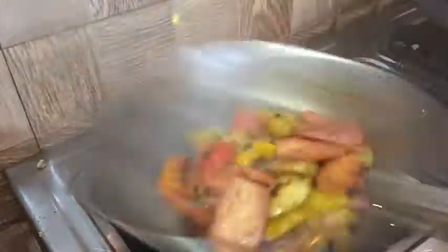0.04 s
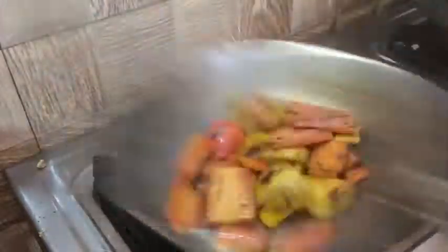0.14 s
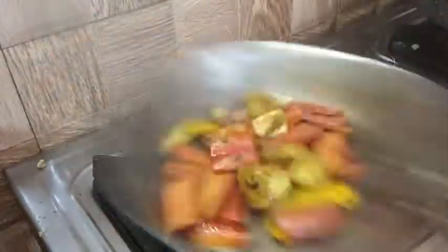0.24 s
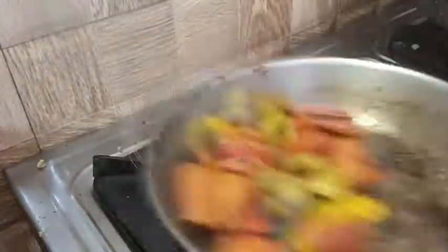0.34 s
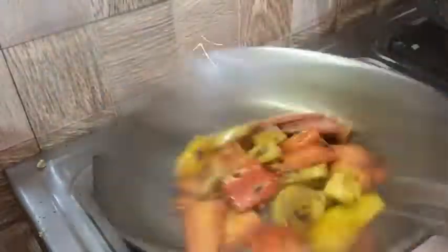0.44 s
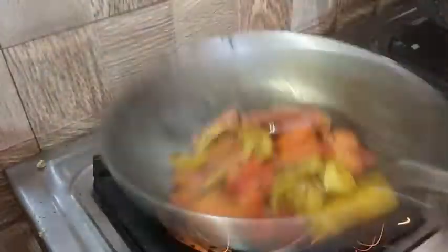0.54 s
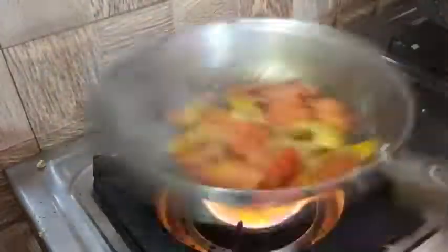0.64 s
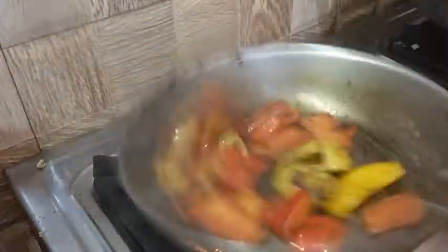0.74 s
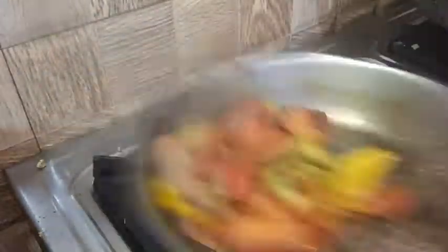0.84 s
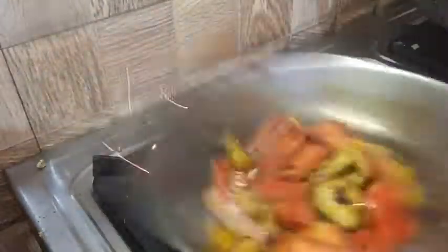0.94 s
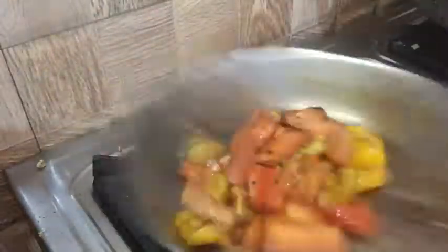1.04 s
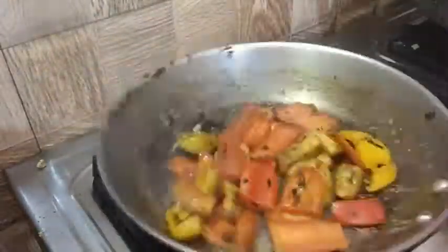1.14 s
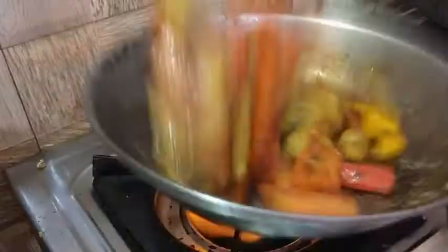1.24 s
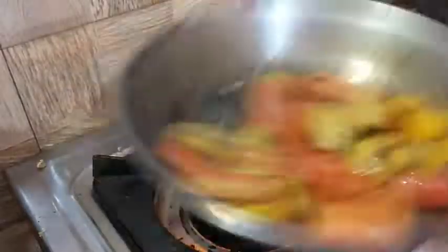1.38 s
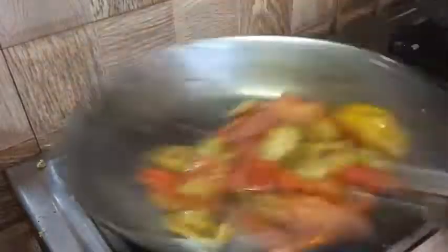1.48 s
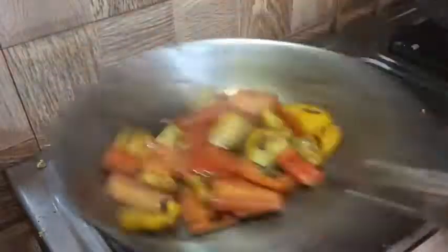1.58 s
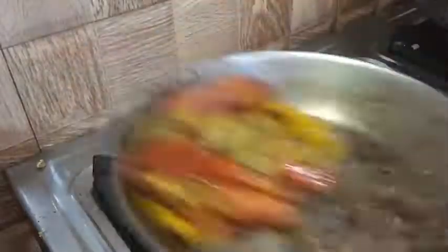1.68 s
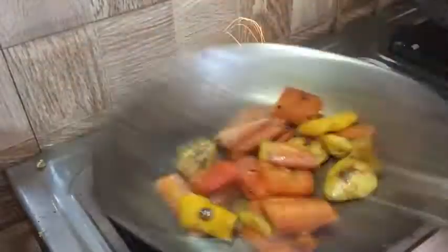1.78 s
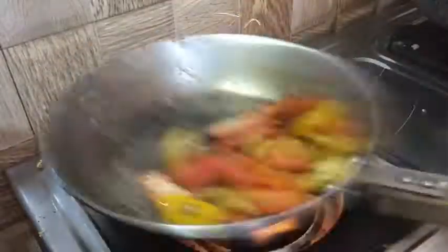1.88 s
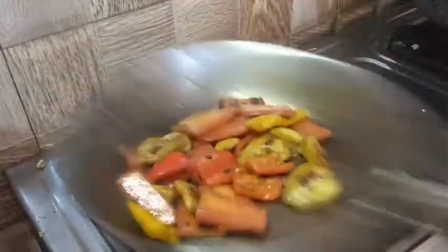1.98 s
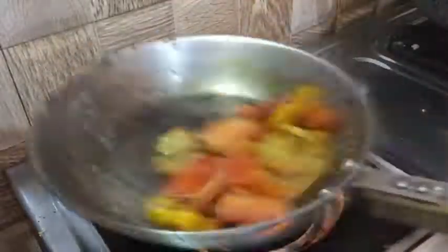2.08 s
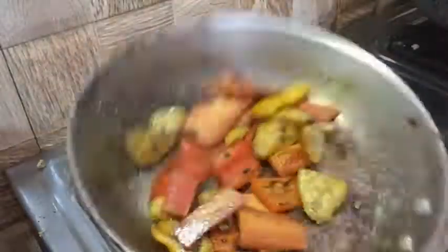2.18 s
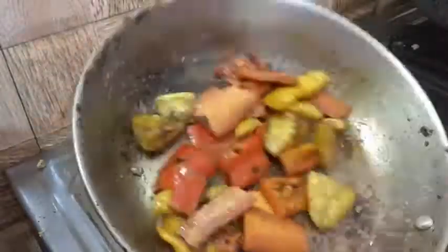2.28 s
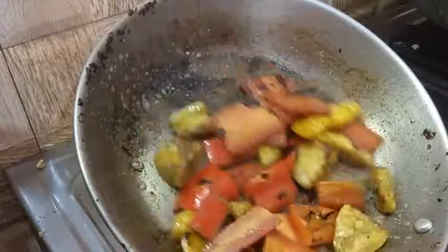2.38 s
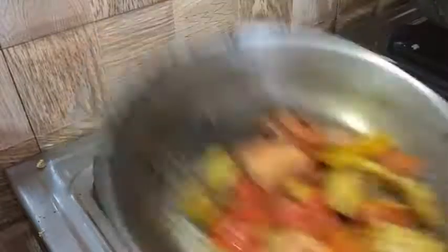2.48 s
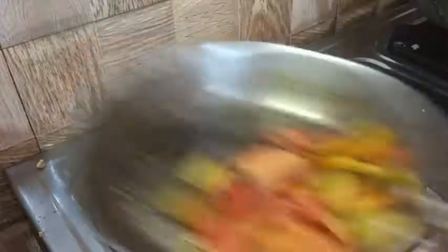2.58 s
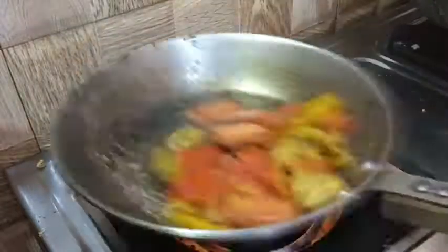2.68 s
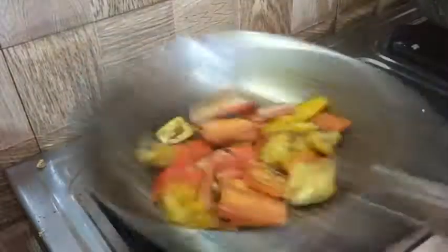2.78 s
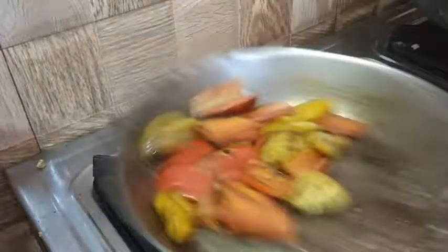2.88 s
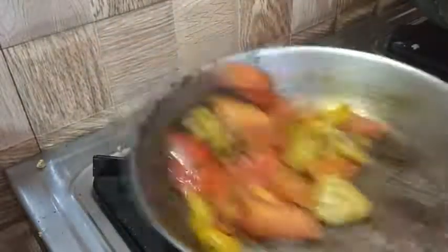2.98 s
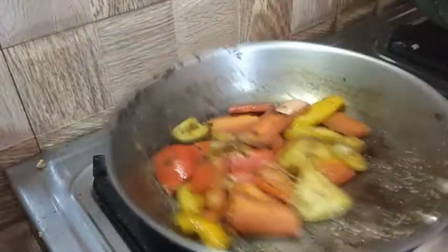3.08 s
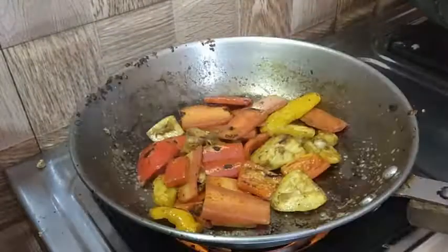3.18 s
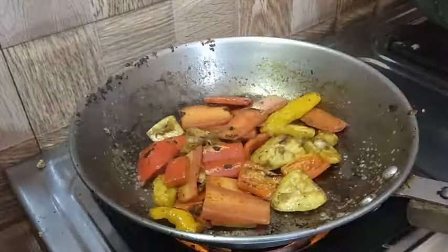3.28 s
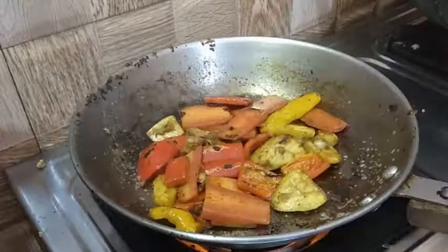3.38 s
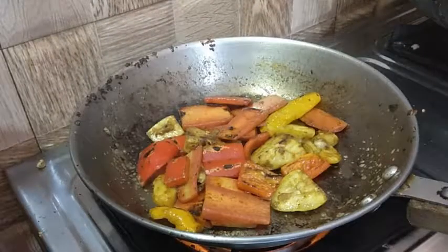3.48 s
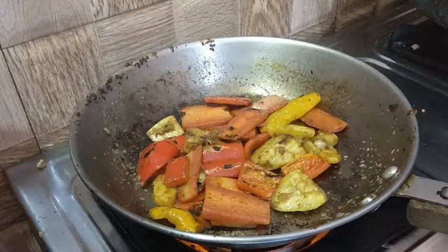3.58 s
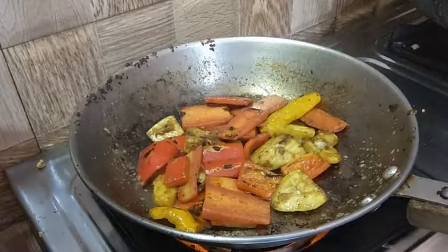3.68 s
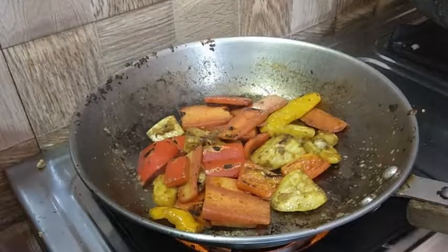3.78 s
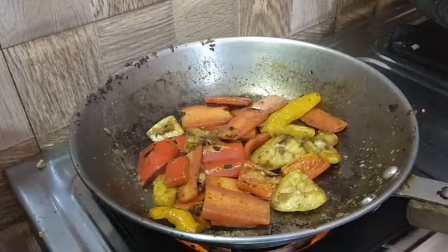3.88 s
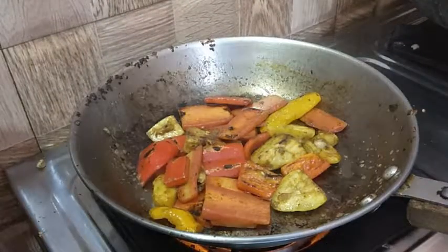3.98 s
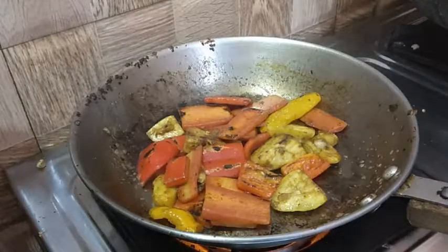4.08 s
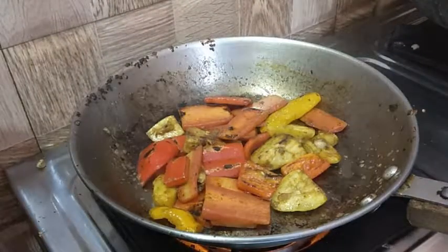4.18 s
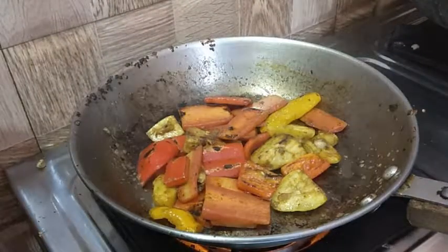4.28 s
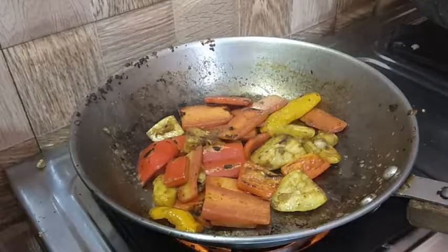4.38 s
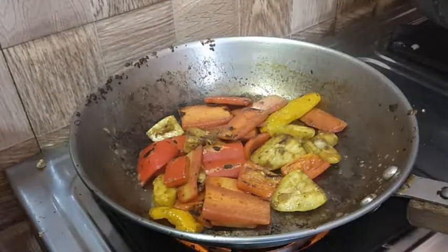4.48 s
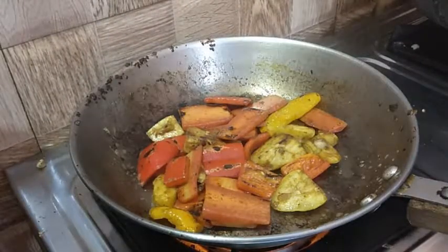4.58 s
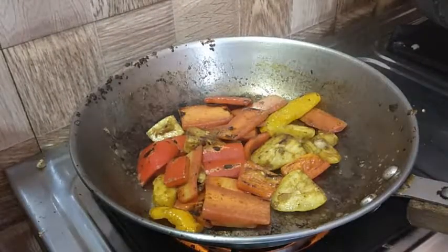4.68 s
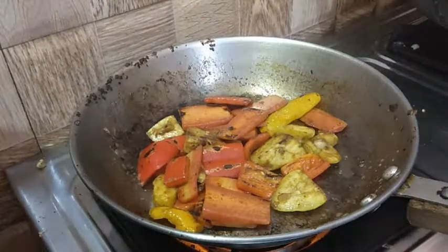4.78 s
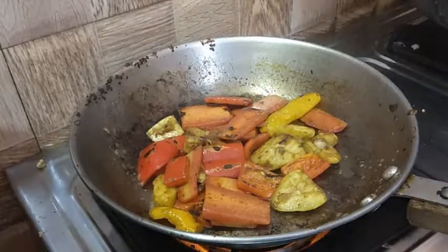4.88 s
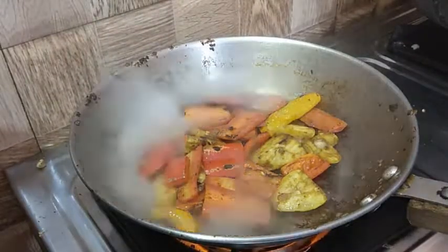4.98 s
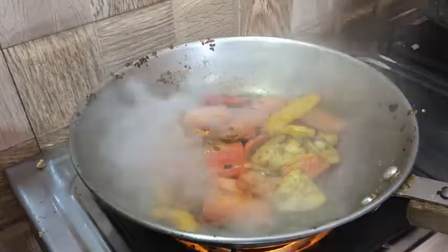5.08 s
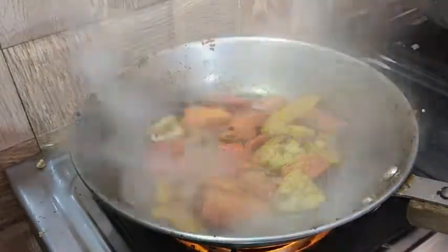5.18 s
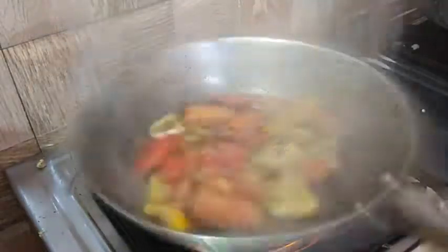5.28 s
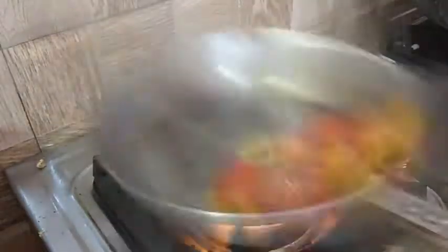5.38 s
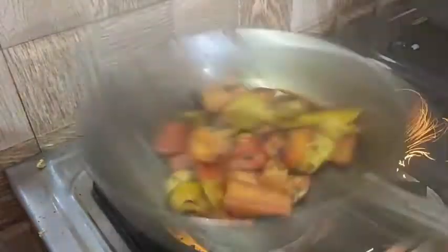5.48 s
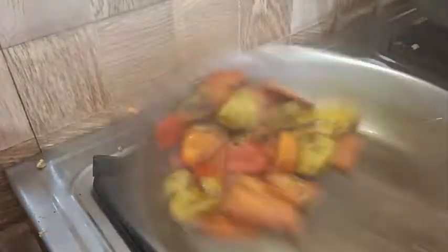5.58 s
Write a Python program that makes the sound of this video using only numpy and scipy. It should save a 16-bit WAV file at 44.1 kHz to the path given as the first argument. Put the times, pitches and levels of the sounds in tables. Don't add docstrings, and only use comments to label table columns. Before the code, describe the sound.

Loud close metallic knocks and drags of a wok, a calm stretch of oil sizzle and gas burner hum, then a sudden steamy hiss and renewed clatter.

```python
import sys
import numpy as np
from scipy import signal
from scipy.fft import rfft, irfft
from scipy.io import wavfile
from scipy.ndimage import uniform_filter1d, minimum_filter1d

SR = 44100
rng = np.random.default_rng(int(sys.argv[2]) if len(sys.argv) > 2 else 0)


def nominal_scale(level):
    x = np.asarray(level, float) / 20
    return 10 ** x


def put_to_file(sound):
    columns = np.atleast_2d(sound).T
    safe = np.clip(columns, -1, 1)
    whole_steps = np.round(safe * 32767)
    wavfile.write(sys.argv[1], SR, whole_steps.astype(np.int16))


N = 248724

# start_s, peak_db, bright_edge_db, fade_t60_s
FIRST_STRIKES = [(0.0, -2.5, -3, 0.28), (0.1538, -5, 0, 0.26), (.21, 2, -3.5, 0.12),
                 (0.2503, -2, -8, 0.097), (.2764, -2.5, -2, 0.4), (0.343, -12, -20, 0.16),
                 (.382, 1.5, -7.5, 0.093), (.417, -3.5, -3, 0.31), (.488, -6, -3.5, 0.4),
                 (0.5857, -4.5, -3.5, 0.5), (.7008, -26, -10, .15), (.7205, -8.5, -5.5, 0.13),
                 (.7383, -7.5, -5.5, 0.27), (0.7847, -7.5, -11, 0.27), (0.849, -8, -5, 0.45),
                 (0.8792, -4.5, -3, 0.22), (.9673, -4.5, -2.5, 0.26), (1.0486, -18, -17, 0.082),
                 (1.1415, -11, -13, 0.089), (1.2523, -14.5, -13, 0.17)]
# start_s, peak_db, bright_edge_db, fade_t60_s
LATER_STRIKES = [(1.4814, -28.5, 13.5, 0.046), (1.5162, -8, -7, 0.14), (1.5698, 5.5, -5, 0.21),
                 (1.651, -7, -7, 0.2), (1.688, -6.5, -5.5, 0.69), (1.738, -4.5, -23, .19),
                 (1.7614, 4.5, -6, 0.15), (1.793, -5.5, -3, 0.2), (1.8683, 3.5, -5, 0.15),
                 (1.8973, -3.5, -6, 0.23), (1.947, -10.5, -10, 0.15), (2.0404, -5.5, -8, .17),
                 (2.0818, -2, -5, .13), (2.6298, 1, -5.5, 0.17), (2.8555, -5.5, -4.5, 0.26),
                 (3.0138, -8.5, -3, 0.44), (3.0694, -15, -11, 0.17), (5.253, -7, -5.5, 0.37),
                 (5.375, -8.5, -7, 0.37), (5.441, -4.5, -1, 0.21), (5.4683, -9.5, -19, .19),
                 (5.5309, -11, 0, 0.17), (5.5576, -9.5, -17, .5)]


def wok():
    # mode_hz, width_hz, level_db
    pan_modes = [(474, 23, 2), (471, 38, -2), (495, 49, -15), (630, 13, -16), (713.2, 22.2, 1),
                 (817, 45, -7.5), (872, 24, -14.5), (921, 6.7, -15.5), (1100, 17, -7.5), (1187, 48, -7),
                 (1310, 36, -13.5), (1413, 120, -7), (1683, 46, -10), (1690, 110, -9.5), (1837, 70, -14.5),
                 (2007, 110, -18), (2232, 93, -10), (2226, 120, -16.5), (2420, 99, -13.5), (2355, 87, -1.5),
                 (2400, 32, -17), (2762, 126, -2.5), (2885, 63, -18.5), (3600, 90, -58), (3783, 58, -12),
                 (5060, 40, -12), (7750, 120, -50)]
    # freq_hz, density_db_per_hz
    rub_spectrum = [(18, -56), (30, -37), (295, -59.5), (390, -12.5), (443, -3), (571, -2.5), (700, -7),
                    (775, -6.5), (2310, -5.5), (3130, -9), (7630, -12.5), (10600, -14.5), (13000, -21)]
    bowl_hz, bowl_width_hz = 713, 23

    force = np.zeros((3, N))
    for start_s, peak_db, bowl_db, edge_db, rise_s, slide_s, t60_s in knocks():
        i, age_s = after(start_s, .4)
        rise = 1 - np.exp(-age_s / rise_s)
        fade_db = -60 * np.maximum(age_s - slide_s, 0) / max(t60_s, .01)
        shape = rise * nominal_scale(peak_db + fade_db)
        crack = 1 + np.array([[.15], [.9], [1.3]]) * np.exp(-age_s / 0.0078)
        balance = nominal_scale(np.array([[bowl_db], [0], [edge_db]]))
        force[:, i] += (shape * crack * balance) ** 2

    slip = grains(per_s=2500, spread_db=3.5, bed=0.94) * nominal_scale(3.44 * walk(140))
    modes = 0
    for k, (hz, width_hz, level_db) in enumerate(pan_modes):
        wander = nominal_scale(2.3 * walk(45))
        modes = modes + (-1) ** k * nominal_scale(level_db) * ring(slip * wander, hz, width_hz)
    body = nominal_scale(1) * unit(modes) + nominal_scale(3) * unit(colour(slip, rub_spectrum))
    bowl, edge = split(body, 900, "low"), split(body, 3200, "high")
    middle = body - bowl - edge
    parts = np.array([steady(p, even=.65) for p in (bowl, middle, edge)])

    hum = steady(ring(rng.standard_normal(N), bowl_hz, bowl_width_hz), even=.7)
    note = ring(np.sqrt(force[0]) * hum, bowl_hz, 1.3 * bowl_width_hz) / 17
    chatter = rattle(per_s=70, fade_s=.004, depth=.7)
    contact = chatter * (np.sqrt(force) * parts).sum(axis=0)
    return nominal_scale(-9.5) * (contact + nominal_scale(-2) * note)


def knocks():
    # start_s, peak_db, bright_edge_db, fade_t60_s
    drags = [(.065, -3.5, -6, 0.51), (.3132, 1, -2.5, 0.099), (.4544, -11.5, -12, 0.13),
             (.5275, -11.5, -2.5, 0.65), (.6244, -8.5, -4, .11), (.814, -6, -5.5, 0.077),
             (.9194, -13, -8, 0.65), (1.618, -3, -3.5, 0.1), (1.9764, 3, -5.5, 0.2),
             (1.9994, -2.5, -3.5, 0.35), (2.5287, -11.5, -2.5, 0.73), (2.5934, -1, -7, 0.098),
             (2.6954, -8, -7, 0.46), (2.7484, -10, -10, 0.21), (2.795, -5.5, -2.5, 0.33),
             (2.9193, -8, -10, 0.25), (2.9714, -7.5, -7.5, 0.41), (3.04, -3.5, -8, 0.15),
             (5.3434, -10.5, -1, 0.23), (5.3994, -7.5, -6, 0.26), (5.4994, -9, -1, 0.12),
             (5.611, -2, -8, 0.18)]
    strike_rise_s, strike_slide_s = .0004, 0.011
    drag_rise_s, drag_slide_s = 0.0047, .017
    kinds = ((FIRST_STRIKES + LATER_STRIKES, strike_rise_s, strike_slide_s),
             (drags, drag_rise_s, drag_slide_s))
    contacts = []
    for rows, rise_s, slide_s in kinds:
        for start_s, peak_db, edge_db, t60_s in rows:
            bowl_db = -12.5 - 0.5 * peak_db + 6.3 * t60_s
            contacts.append((start_s, peak_db, bowl_db, edge_db, rise_s, slide_s, t60_s))
    return contacts


def rattle(per_s, fade_s, depth):
    jumps = (rng.random(N) < per_s / SR) * np.minimum(rng.exponential(size=N), 2.5)
    jumps[[int(row[0] * SR) for row in FIRST_STRIKES + LATER_STRIKES]] = 0.4
    rebounds = signal.lfilter([1], [1, -np.exp(-1 / (fade_s * SR))], jumps)
    return unit(1 + depth * rebounds)


def pings():
    # start_s, peak_db, mode_hz, t60_s
    touches = [(0.38, -13, 3770, 0.05), (.645, -9.5, 3960, .06), (.645, -5.5, 7750, 0.073),
               (1.142, -13, 990, 0.054), (1.143, -23, 2380, .05), (1.255, -23, 1100, 0.088),
               (1.262, -18, 2490, 0.14), (1.515, -9.5, 1346, 0.066), (1.516, -4, 2430, 0.038),
               (1.573, -7.5, 2400, 0.2), (1.83, -15, 3600, 0.076), (1.829, -16, 2430, 0.086),
               (1.868, -1, 4000, 0.044), (2.04, -10, 3750, 0.064), (2.087, -3, 2885, 0.081),
               (2.795, -16, 3970, .08), (3.013, -17, 3680, 0.099), (5.532, -7, 6350, 0.033)]
    out = np.zeros(N)
    for start_s, peak_db, hz, t60_s in touches:
        i, age_s = after(start_s, .4)
        rise = 1 - np.exp(-age_s / 0.00043)
        out[i] += rise * nominal_scale(peak_db - 60 * age_s / t60_s) * np.sin(2 * np.pi * hz * age_s)
    return out * nominal_scale(2.2 * walk(200))


def sizzle(top_db, body_db):
    # freq_hz, density_db_per_hz
    hiss_spectrum = [(30, -12.5), (270, -9.5), (800, -7.5), (1200, -1.5), (1700, 0.5), (2300, 1.5),
                     (5000, 0.5), (9800, -0.5), (11700, -5), (13000, -7)]
    fizz = colour(grains(per_s=3000, spread_db=2.6, bed=1.3), hiss_spectrum)
    fizz = fizz / np.std(split(fizz, 4500, "high"))
    low = signal.sosfilt(signal.butter(1, 2500, fs=SR, output="sos"), fizz)
    flicker_db = .6 * walk(30) + .8 * walk(120)
    return nominal_scale(top_db + flicker_db) * mottle(fizz + (nominal_scale(body_db) - 1) * low)


def mottle(x):
    lows = [split(x, hz, "low") for hz in (1400, 2500, 4200, 7000)]
    bands = [b - a for a, b in zip([0] + lows, lows + [x])]
    return sum(band * nominal_scale(1.66 * walk(35)) for band in bands)


def spits():
    # start_s, peak_db
    drops = [(3.3588, -21), (3.5608, -18), (3.9808, -9.5), (4.3896, -15.5), (4.648, -17), (4.8763, -20),
             (4.8944, -17), (4.955, -2), (4.965, -19), (4.915, -17), (1.6885, -12)]
    out, hiss = np.zeros(N), rng.standard_normal(N)
    for start_s, peak_db in drops:
        i, age_s = after(start_s, .1)
        burst = np.exp(-age_s / 0.0013) + 0.38 * np.exp(-age_s / 0.013)
        out[i] += nominal_scale(peak_db - 3.0) * burst * hiss[i]
    return split(out, 1100, "high")


def frying():
    # time_s, sizzle_db
    oil_heat = [(0, -29.5), (.31, -23), (1.09, -26), (1.26, -30), (1.57, -25.5), (2.0, -30.5),
                (2.32, -27.5), (2.63, -27), (3.05, -27.5), (3.22, -32), (3.87, -31.5), (4.2, -31.5),
                (4.6, -37), (4.72, -30.5), (4.87, -36.5), (5.64, -35.5)]
    # leaves_s, lands_s, hush_db
    flights = [
        (1.092, 1.133, -12),
        (1.192, 1.254, -22),
        (1.93, 1.964, 2),
        (2.095, 2.312, -5.5),
    ]
    lift_s, steam_s = 0.03, 4.877
    t = np.arange(N) / SR
    oil_db = curve(*np.transpose(oil_heat))
    for leaves_s, lands_s, hush_db in flights:
        lift = 1 - np.exp(-np.maximum(t - leaves_s, 0) / lift_s)
        oil_db = oil_db + hush_db * (t < lands_s) * lift

    age_s, steaming = np.maximum(t - steam_s, 0), t >= steam_s
    burst_db = 2.5 * np.exp(-(age_s / 0.12) ** 4)
    sag_db = 4 * np.minimum(age_s, .37)
    top_db = np.where(steaming, -20 + burst_db - sag_db, oil_db)
    steam_body_db = 2 + 2.5 * np.exp(-age_s / 0.046)
    body_db = np.where(steaming, steam_body_db, 4 - 0.45 * (oil_db + 32))
    flame_dip_db = -18 * steaming * np.exp(-(age_s / 0.19) ** 2)
    flame_db = np.interp(t, [1.3, 2.2], [-33.5, -31]) + flame_dip_db
    return top_db, body_db, flame_db


def flame(db):
    # pitch_hz, waver_hz, level_db
    tones = [(269.3, 3, -42), (324.5, 4, -43), (392, 7, -45), (429, 8, -42), (438, 6, -45), (461, 7, -45),
             (486, 4, -39), (495, 3, -34), (539, 4, -43), (651, 4, -44), (672, 4, -40), (706, 5, -45),
             (727, 5, -43), (764, 8, -48), (819, 4, -38.5), (873.5, 4, -44), (1044, 12, -50),
             (1200, 6, -45), (1211, 6, -42), (1258, 6, -49), (1290, 8, -48), (1310, 8, -49), (1367, 8, -48),
             (1453, 8, -49), (1470, 7, -47), (1527, 5, -50)]
    # freq_hz, density_db_per_hz
    roar_spectrum = [(18, -55), (30, -36), (214, -28), (260, -22), (370, -15), (490, -7.5), (585, -19.5),
                     (680, -13.5), (1500, -15.5), (2600, -22), (4500, -33)]
    hum = 0
    for hz, waver_hz, level_db in tones:
        phase = 2 * np.pi * np.cumsum(hz + .45 * waver_hz * walk(25)) / SR
        hum = hum + nominal_scale(level_db + 1.04 * walk(12)) * np.sin(phase + 2 * np.pi * rng.random())
    roar = unit(colour(rng.standard_normal(N), roar_spectrum)) * nominal_scale(1.1 * walk(6.5))
    return nominal_scale(db + 1.0) * (unit(hum) + nominal_scale(-1.5) * roar)


def after(s, length):
    i = np.arange(int(np.ceil(s * SR)), min(int((s + length) * SR), N))
    return i, np.maximum(i / SR - s, 0)


def curve(s, v):
    return np.interp(np.arange(N) / SR, s, v)


def unit(x):
    return x / np.sqrt(np.mean(x ** 2))


def steady(x, even):
    power = uniform_filter1d(x ** 2, SR // 80) + 1e-9
    return unit(x / power ** (even / 2))


def colour(x, shape):
    hz, db = np.transpose(shape)
    grid_hz = np.linspace(1, SR / 2, 1025)
    c = irfft(np.log(nominal_scale(np.interp(np.log(grid_hz), np.log(hz), db))))
    c[1:1024] *= 2
    c[1025:] = 0
    return signal.fftconvolve(x, irfft(np.exp(rfft(c))))[:N]


def ring(x, hz, width_hz):
    r = np.exp(-np.pi * width_hz / SR)
    gain = np.sqrt(1 - r * r)
    poles = [1, -2 * r * np.cos(2 * np.pi * hz / SR), r * r]
    return signal.lfilter([gain, 0, -gain], poles, x) / np.sqrt(2)


def split(x, hz, kind):
    return signal.sosfiltfilt(signal.butter(2, hz, kind, fs=SR, output="sos"), x)


def walk(rate):
    k = int(SR / rate)
    held = np.repeat(rng.standard_normal(N // k + 1), k)
    return 1.3 * uniform_filter1d(uniform_filter1d(held, k), k)[:N]


def grains(per_s, spread_db, bed):
    hit = rng.random(N) < per_s / SR
    size = np.minimum(rng.exponential(size=N), 4)
    clicks = hit * rng.choice([-1, 1], N) * nominal_scale(spread_db * size)
    return unit(unit(clicks) + bed * rng.standard_normal(N))


def scene():
    top_db, body_db, flame_db = frying()
    near = wok() + pings() + spits() + sizzle(top_db, body_db)
    tail_s = np.arange(SR // 4) / SR
    tail = rng.standard_normal(SR // 4) * nominal_scale(-60 * tail_s / 0.15)
    room = signal.fftconvolve(near, tail / np.sqrt(np.sum(tail ** 2)))[:N]
    return (near + nominal_scale(-18) * room + flame(flame_db))[None]


def roll_off(x):
    return signal.sosfilt(signal.butter(12, 15850, fs=SR, output="sos"), x)


def record(dry):
    top_hz, hold_s = 11350, 0.00061
    ceiling, knee = .78, 20
    x = signal.sosfiltfilt(signal.butter(12, top_hz, fs=SR, output="sos"), dry)
    span = max(int(hold_s * SR), 3)
    duck = np.minimum(1, 1.06 * ceiling / (np.abs(x) + 1e-9))
    x = x * uniform_filter1d(minimum_filter1d(duck, span), span)
    x = x / (1 + np.abs(x / ceiling) ** knee) ** (1 / knee)
    return roll_off(x)


dry = scene()
out = record(dry)
put_to_file(out)
```